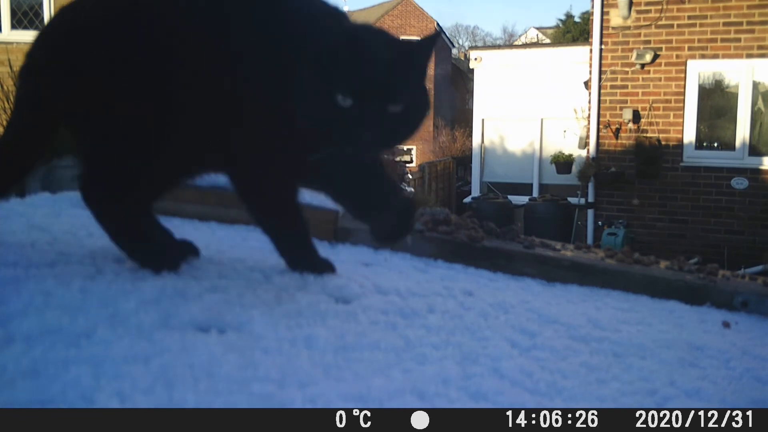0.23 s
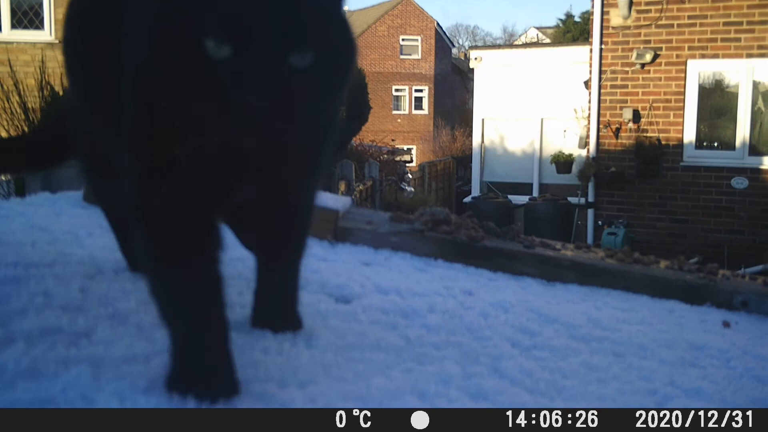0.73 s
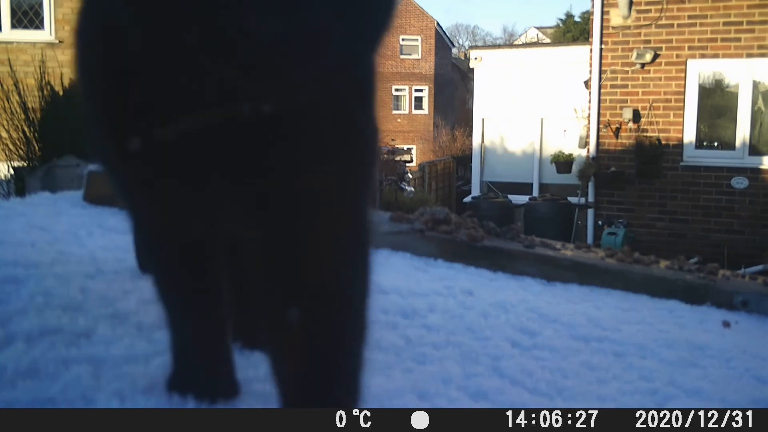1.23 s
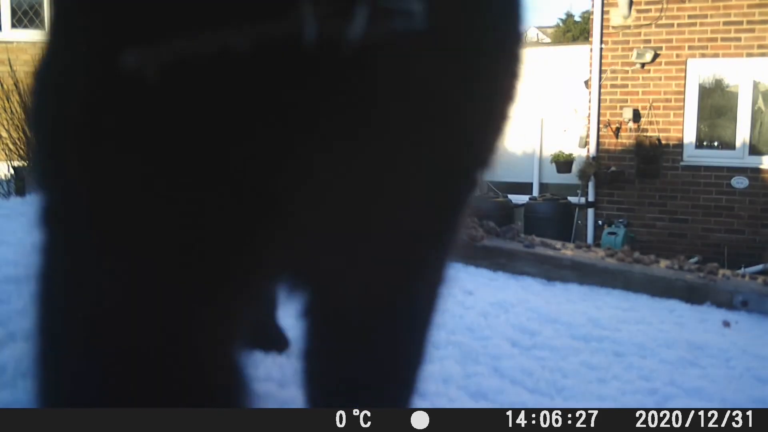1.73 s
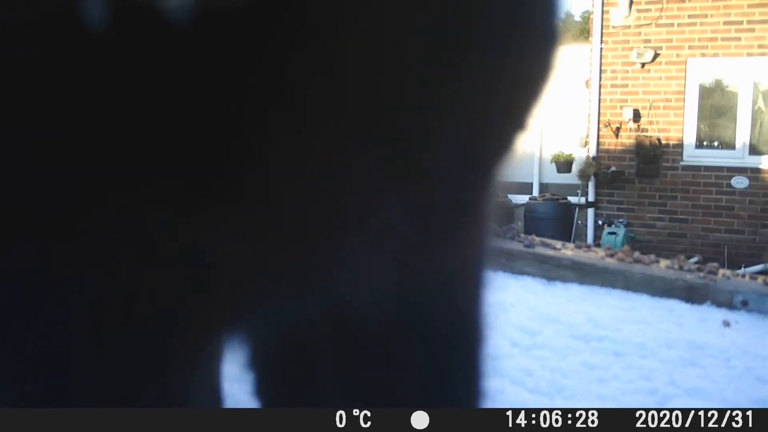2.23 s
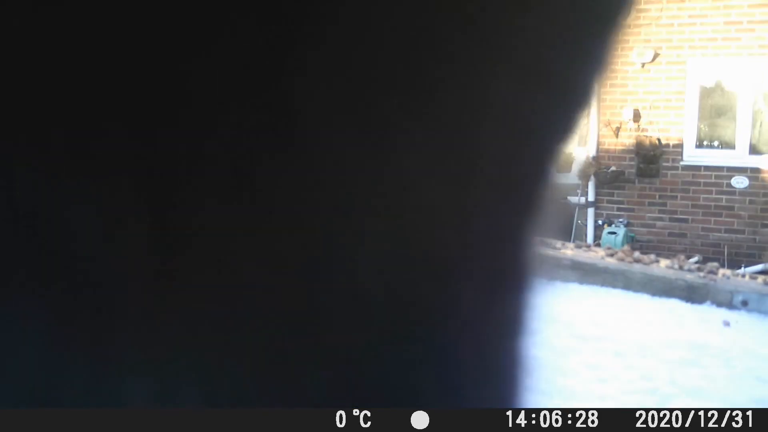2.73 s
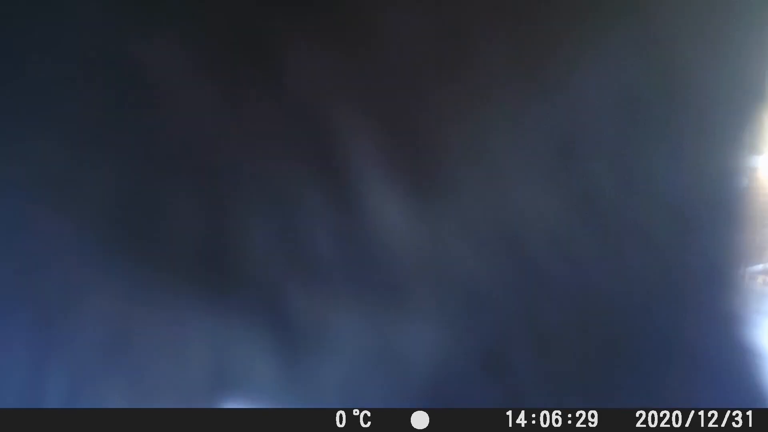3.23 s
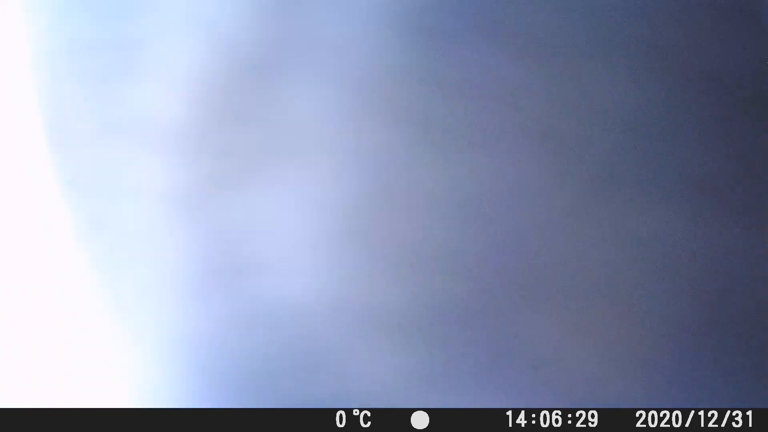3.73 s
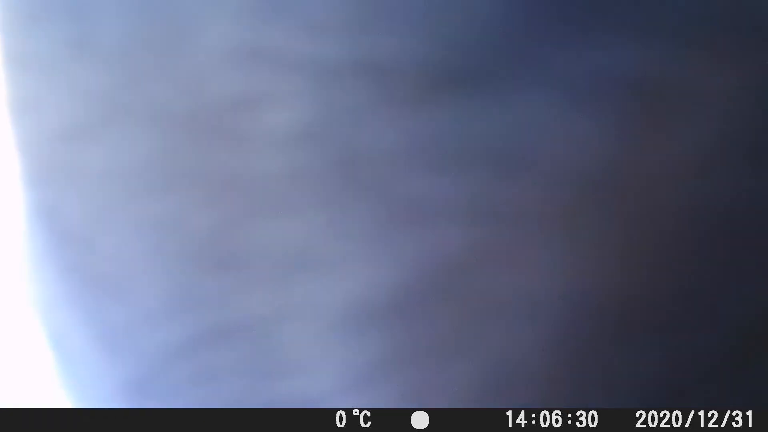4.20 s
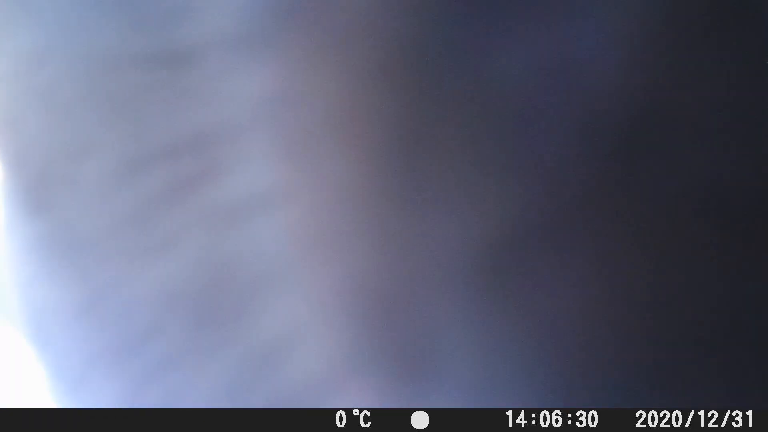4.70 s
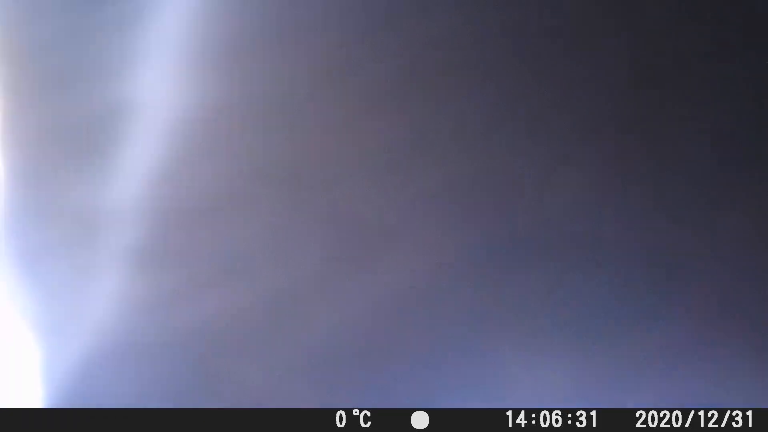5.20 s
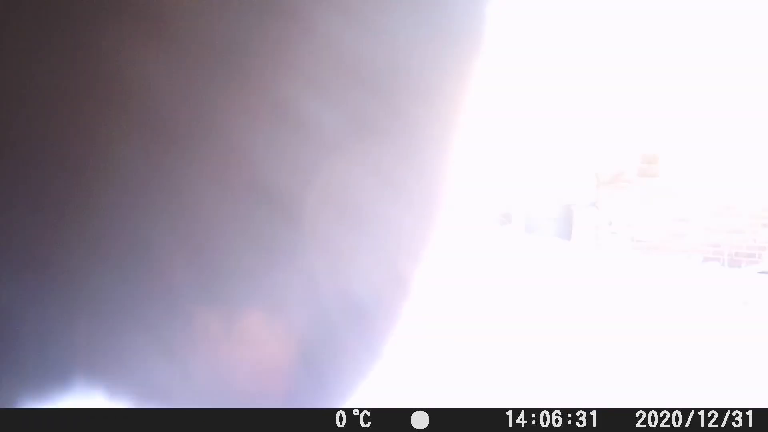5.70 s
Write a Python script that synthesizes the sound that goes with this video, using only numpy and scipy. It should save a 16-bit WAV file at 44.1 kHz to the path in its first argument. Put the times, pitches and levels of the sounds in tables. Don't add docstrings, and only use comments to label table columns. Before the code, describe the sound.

Heard from inside a plastic camera casing on a frosty roof: low wind buffeting and faint outdoor air, then a cat's contacts, very close. Small taps and brushes lead to a hard double shove with ringing, boxy clacks. A lull follows, then rubbing fur, clustered ticks, a brief wind thud, and a final busy patch of scuffs with one bright click. Mono, muffled sound with little treble.

```python
import sys
import numpy as np
from scipy import signal
from scipy.fft import rfft, irfft, next_fast_len
from scipy.io import wavfile
from scipy.ndimage import uniform_filter1d, map_coordinates

SR = 44100
rng = np.random.default_rng(int(sys.argv[2]) if len(sys.argv) > 2 else 0)


def invert_db(x):
    u = np.asarray(x, float) / 20
    return 10 ** u


def to_wav(sig):
    pcm = np.clip(np.atleast_2d(sig), -1, 1) * 32767
    pcm = np.round(pcm).astype(np.int16)
    wavfile.write(sys.argv[1], SR, pcm.T)


N = 262395


def unit(x):
    return x / np.sqrt(np.mean(x ** 2) + 1e-20)


def curves(rows):
    s, *columns = np.transpose(rows)
    t = np.arange(N) / SR
    return np.array([np.interp(t, s, column, -120, -120) for column in columns])


def wobble(knots_per_s):
    knots = rng.standard_normal(N // 50)
    return map_coordinates(knots, [np.arange(N) * knots_per_s / SR])


def filtered(x, response):
    m = next_fast_len(x.shape[-1] + SR // 4)
    spectrum = rfft(x, m) * response(np.fft.rfftfreq(m, 1 / SR))
    return irfft(spectrum, m)[..., :x.shape[-1]]


def noise(spectrum):
    f, db = np.transpose(spectrum)
    colour = lambda hz: invert_db(np.interp(np.log(hz + 1), np.log(f + 1), db))
    return unit(filtered(rng.standard_normal(N), colour))


def resonance(f, centre_hz, width_hz):
    damping = 1j * f * width_hz
    return damping / (centre_hz ** 2 - f * f + damping)


def ring(force, modes):
    def response(f):
        soft = 1 / (1 + 1j * f / (1.3 * modes[-1][0])) ** 3
        total = 0
        for k, (centre_hz, width_hz, db) in enumerate(modes):
            total = total + (-1) ** k * invert_db(db) * resonance(f, centre_hz, width_hz)
        return soft * total
    return filtered(force, response)


def struck(times, peak_db, modes, contact_s, push=0, rise=0.69):
    t = np.arange(SR // 4) / SR
    shape = (1 - np.exp(-t / (rise * contact_s))) * np.exp(-t / contact_s)
    ragged = rng.standard_normal((64, len(t)))[:len(times)]
    rings = ring((push + ragged) * shape, modes)
    rings = rings / np.abs(rings).max(axis=1, keepdims=True) * invert_db(peak_db)[:, None]
    first = np.round((times - rise * contact_s) * SR).astype(int)
    spots = first[:, None] + np.arange(len(t))
    return np.bincount(spots.ravel(), rings.ravel(), N + SR)[:N]


# start_s, level_db
WIND_STRENGTH = [(0.0, -33.5), (0.45, -42), (1.0, -40), (1.4, -43), (1.7, -42.5), (2.2, -41.5), (2.5, -45),
                 (3.0, -37.5), (3.18, -44), (3.47, -36), (4.18, -43.5), (4.23, -26.5), (4.255, -29.5),
                 (4.28, -21), (4.35, -43), (5.3, -40), (5.52, -38), (5.95, -35.5)]
# pitch_hz, level_db (per Hz)
BUFFET_SPECTRUM = [(4, -11), (12, 6), (28, -3.5), (45, -8.5), (70, -20.5), (150, -61.5), (400, -120)]
# pitch_hz, level_db (per Hz)
RUMBLE_SPECTRUM = [(20, -47), (50, -2), (100, 5), (135, -8.5), (165, -26.5), (250, -56), (600, -120)]


def wind():
    evening = 0.37
    mean_rumble_db, follow = -58, 0.47
    strength_db, = curves(WIND_STRENGTH)
    swell = noise(BUFFET_SPECTRUM)
    power = np.abs(uniform_filter1d(swell ** 2, SR // 12))
    swell = unit(swell / (power + 0.028) ** (evening / 2))
    lumps = invert_db(2.6 * wobble(12))
    rumble = unit(lumps * noise(RUMBLE_SPECTRUM))
    rumble_db = mean_rumble_db + follow * (strength_db - strength_db.mean())
    return invert_db(strength_db) * swell + invert_db(rumble_db) * rumble


# pitch_hz, level_db (per Hz)
HUSH_SPECTRUM = [(60, -26), (160, 2), (260, -2), (440, -5.5), (910, -13.5), (1380, -10), (2400, -14.5),
                 (3300, -19), (4800, -28), (6500, -23), (8000, -34)]
# pitch_hz, width_hz, level_db
SHELL = [(893.3, 40.6, 0.5), (1001, 29.4, 2.5), (1051.8, 42, 0), (1093, 87, -10.5), (1177, 74, -16)]


def air():
    hush = noise(HUSH_SPECTRUM) * invert_db(0.1 * wobble(2.8))
    shell_hum = unit(ring(rng.standard_normal(N), SHELL))
    return invert_db(-61.0) * hush + invert_db(-72) * shell_hum


# start_s, shell peak level_db, then back_db, lid_db, crack_db relative to the shell
TAPS = [(0.318, -34, -6.5, -3, -18), (0.511, -46, 4, -3, -9), (1.052, -32.5, -20, -16.5, -4.5),
        (1.088, -41, -16, -12, -0.5), (1.267, -42, -30, -15, -15), (1.803, -40, -19, -19.5, -27),
        (1.862, -24, -24, -15.5, -18.5), (2.025, -33.5, -27, -17, -25), (2.062, -16, -12, -17.5, -21),
        (2.086, -21.5, -11, -22, -21), (2.107, -30.5, -7, -10, -17.5), (3.407, -35.5, -24, -33, -26),
        (3.435, -35.5, 0, -16, -30), (3.562, -21.5, -1, -15, -21), (3.653, -42, -3, -8.5, -6),
        (3.686, -36, -1, -11, -28), (5.205, -29.5, -15.5, -15, -32), (5.316, -42.5, -20, 0.5, -22),
        (5.421, -45, -5, -3.5, -41), (5.454, -32.5, -40, -10, -33), (5.518, -35.5, -17, 9, -14),
        (5.649, -37.5, -25, -10, -18), (5.756, -42.5, -9, -3, -30), (5.874, -43, -27, -5, -27)]
# start_s, shell peak level_db
TICKS = [(0.266, -46.5), (0.95, -43.5), (1.1, -39), (1.196, -53), (1.341, -39.5), (1.501, -52), (1.65, -54),
         (2.004, -42), (2.152, -40), (2.175, -33), (2.855, -42.5), (3.19, -48.5), (3.229, -42.5),
         (3.281, -38.5), (3.321, -37), (3.499, -40), (3.617, -42), (3.738, -49.5), (3.774, -45.5),
         (3.976, -44.5), (4.177, -47), (4.531, -47.5), (4.89, -53), (5.105, -44), (5.246, -37.5),
         (5.37, -37), (5.678, -35.5)]
# back_db, lid_db, crack_db
TICK_COLOUR = (-16, -17.5, -16)
# start_s, peak level_db, spark_db relative to the peak
SNAPS = [
    (1.0486, -47, 2),
    (1.0884, -48.5, -18.5),
    (1.095, -48.5, -19),
    (2.062, -49.5, 2),
    (2.0812, -60, 6),
    (2.112, -63, -20),
    (5.5134, -22.5, -6),
]
# pitch_hz, width_hz, level_db
BACK = [(358.2, 18, -8), (436.7, 24.4, -3.5), (559, 63, -8.5)]
LID = [(1330, 450, 2.5), (1378, 248, -5.5), (1644, 18, -1.5), (1860, 500, -7), (2111, 118, 3),
       (2273, 122, 3.5), (2508, 150, -2)]
RIM = [(3330, 1200, -5.5), (3930, 740, -4), (5900, 400, -18.5), (6395, 57, 0), (7000, 2200, -10)]
# pitch_hz, width_hz, level_db
GAP = [(1330, 570, -20), (2480, 760, 6), (3920, 640, 2)]
# pitch_hz, width_hz, level_db
SPARK = [(5200, 2000, -10.5), (6630, 1100, -1.5)]


def taps():
    light = [(*tick, *TICK_COLOUR) for tick in TICKS]
    s, db, back_db, lid_db, crack_db = np.transpose(TAPS + light)
    s = s - 0.0025
    x = struck(s, db - 5.5, SHELL, contact_s=0.0023, rise=0.2)
    x += struck(s, db + back_db - 1.0, BACK, contact_s=0.0039, rise=0.19)
    x += struck(s - 0.0015, db + lid_db - 0.5, LID, contact_s=0.00395, rise=0.329)
    x += struck(s, db + crack_db - 6, RIM, contact_s=0.0021, rise=0.099)
    s, db, spark_db = np.transpose(SNAPS)
    x += struck(s, db - 0.7, GAP, contact_s=0.0027, rise=0.059)
    x += struck(s, db + spark_db - 0.3, SPARK, contact_s=0.0018, rise=0.022)
    return x


def contact_force(rows, press, lift):
    start, length, db, mount_db, back_db = np.transpose(rows)
    steps = np.arange(0, N + 32, 32)
    t = steps / SR - start[:, None]
    ramp_db = np.minimum(press * t, lift * (length[:, None] - t))
    force = invert_db(db[:, None] - 4 + np.minimum(0, ramp_db))
    parts = [invert_db(rel_db) @ force for rel_db in (0 * db, mount_db, back_db)]
    return np.array([np.interp(np.arange(N), steps, part) for part in parts])


# start_s, length_s, shell level_db, then mount_db, back_db relative to the shell
STROKES = [(0.268, 0.037, -54.5, -6, 0), (0.58, 0.041, -61, -2, 2), (0.955, 0.032, -54, 5, 3.5),
           (1.15, 0.095, -59.5, -3, -3), (1.323, 0.05, -58.5, -1, -2.5), (1.639, 0.072, -44.5, -1, -7),
           (1.766, 0.059, -65.5, 0.5, -5), (1.82, 0.015, -50, -0.5, -4), (2.09, 0.028, -49.5, 1, -8),
           (2.24, 0.082, -65.5, 5, -2.5), (3.285, 0.041, -46, -2.5, 2.5), (3.385, 0.043, -51, -3.5, -2.5),
           (3.48, 0.067, -53, -1, -2), (3.705, 0.064, -49, -5.5, -9.5), (3.91, .12, -71, -6, -2),
           (5.05, 0.031, -49.5, 4, -4), (5.095, 0.062, -50, -2.5, -9), (5.215, 0.045, -45, -5, -8.5),
           (5.335, 0.029, -47.5, -2, -11), (5.4, .04, -49, -1, -5), (5.528, 0.06, -57.5, -10, -6.5),
           (5.65, 0.063, -50, -4.5, -1), (5.833, .11, -54, 2.5, -7.5)]
# start_s, shell level_db, then mount_db, back_db relative to the shell
BRUSHES = [(0.312, -56, -3, 1), (0.43, -66, 6, -1), (0.513, -54, -2, -1), (1.096, -49, 7, 7),
           (1.19, -48.5, -5, -3), (1.49, -51, -7, -1.5), (1.86, -62, 7, -11), (1.871, -61, 0.5, -6),
           (2.019, -48, -2, -25), (2.063, -40, 6.5, 4), (2.168, -44, -11, -9.5), (2.855, -53, -3.5, -12),
           (2.885, -70, -12, -3), (3.225, -65, -5, -4), (3.559, -47, -2, 6.5), (3.684, -48.5, -10, -2),
           (3.835, -49.5, -20.5, -19), (4.18, -55, -8, -22), (4.435, -60.5, -1.5, 2), (4.53, -63.5, -8, -9),
           (4.885, -54, -19, -11.5), (5.453, -60, 3, -10), (5.514, -53, 9.5, -1)]
# pitch_hz, width_hz, level_db
MOUNT = [(226, 16.3, 1.5), (239.2, 40, -14.5)]
SWAY = [(101, 60, -7), (123.3, 15.7, 5.5)]
# pitch_hz, width_hz, level_db
PANEL = [(590, 160, -4.5), (1250, 170, 2.5), (1680, 560, -6)]


def fur():
    brush_s = 0.0087
    strokes = contact_force(STROKES, press=404, lift=253.5)
    brushes = contact_force([(s, brush_s, *db) for s, *db in BRUSHES], press=1798.5, lift=519.5)
    shell, mount, back = strokes + brushes
    lid = invert_db(-11) * shell
    leaning = np.arange(N) > 3.2 * SR
    panel = invert_db(-6.5) * strokes[0] * leaning
    clumps = invert_db(2 * wobble(30) + 2.5 * wobble(120))
    hairs = clumps * invert_db(5 * wobble(300))

    def drive(level, grain, modes):
        steady = ring(grain * rng.standard_normal(N), modes)
        return ring(level * grain * rng.standard_normal(N), modes) / np.std(steady)

    x = drive(mount, clumps, MOUNT) + invert_db(-3.5) * drive(mount, clumps, SWAY)
    x += drive(back, clumps, BACK) + drive(shell, clumps, SHELL) + drive(lid, clumps, LID)
    return x + invert_db(-10.5) * drive(lid, hairs, RIM) + drive(panel, hairs, PANEL)


# start_s, peak level_db
NUDGES = [(0.273, -40.5), (0.31, -38.5), (0.51, -40), (0.957, -55), (1.098, -28), (1.827, -61),
          (1.861, -32.5), (2.06, -22.5), (2.084, -27.5), (2.176, -34.5), (3.279, -50), (3.437, -54.5),
          (3.563, -29.5), (3.685, -65), (4.433, -50.5), (5.098, -42.5), (5.243, -41), (5.397, -54),
          (5.689, -37)]
# start_s, peak level_db
SHOVES = [
    (0.312, -42.5),
    (0.507, -39),
    (1.095, -46),
    (1.689, -42.5),
    (1.856, -36.5),
    (2.06, -17.5),
    (3.564, -34.5),
    (3.682, -46.5),
    (5.678, -45),
]


def nudges():
    s, db = np.transpose(NUDGES)
    rock = struck(s - 0.002, db - 1.2, MOUNT, contact_s=0.00069, push=0.13)
    s, db = np.transpose(SHOVES)
    return rock + struck(s - 0.002, db + 0.29, SWAY, contact_s=0.0041, push=0.4)


def scene():
    return (wind() + air() + taps() + fur() + nudges())[None]


# pitch_hz, width_hz, depth_db
PORT = [(169, 52, 16), (635, 253, 30.5)]


def port_notches(f):
    response = 1
    for centre_hz, width_hz, depth_db in PORT:
        stiff, damping = centre_hz ** 2 - f * f, 1j * f * width_hz
        response = response * (stiff + damping * invert_db(-depth_db)) / (stiff + damping)
    return response


def roll_off(x):
    return signal.sosfilt(signal.butter(12, 7920, fs=SR, output="sos"), x)


def record(dry):
    edge = lambda hz: invert_db(np.interp(hz, [7250, 7500, 7950], [0, -6, -45]))
    heard = filtered(dry, lambda f: port_notches(f) * edge(f))
    noise_floor = invert_db(-100) * rng.standard_normal(dry.shape)
    return roll_off(heard + noise_floor)


dry = scene()
out = record(dry)
to_wav(out)
```